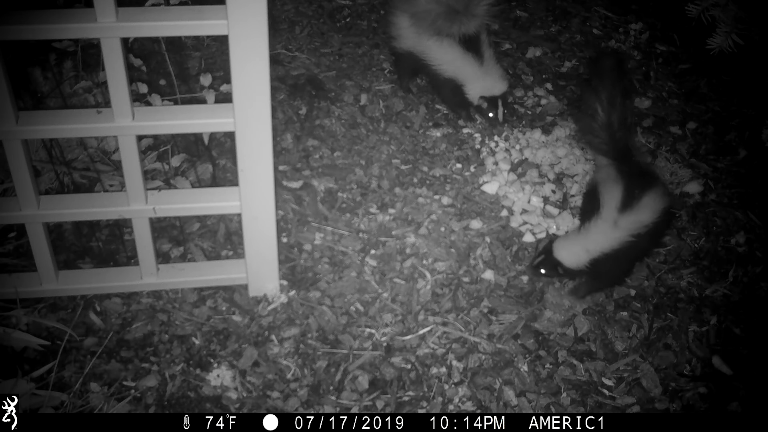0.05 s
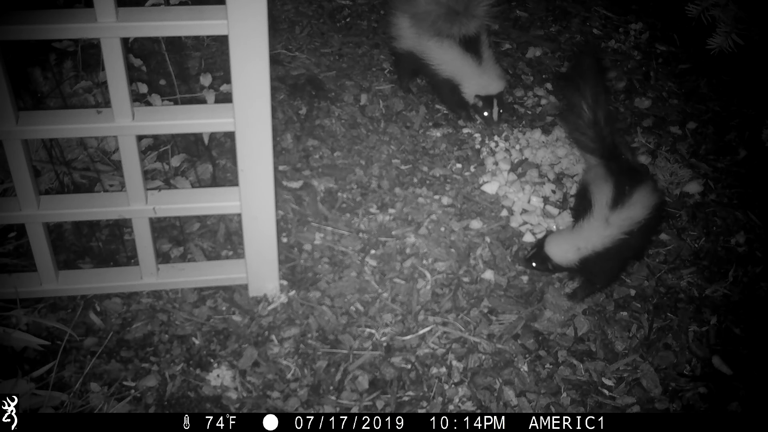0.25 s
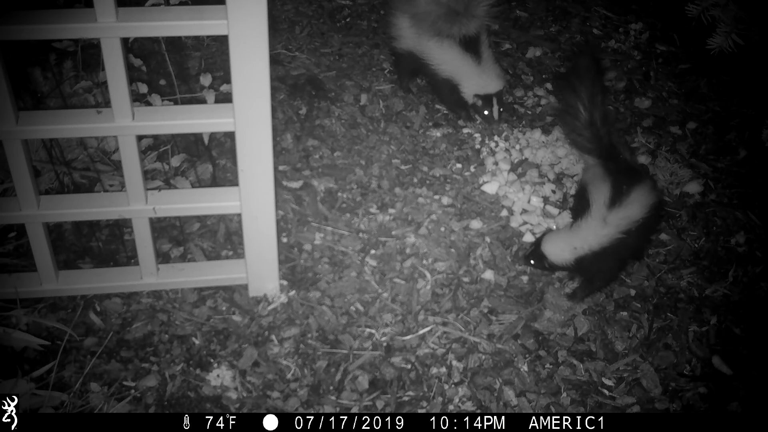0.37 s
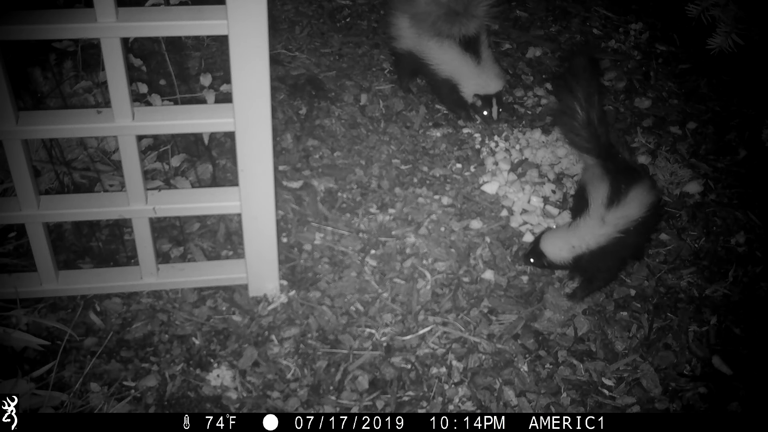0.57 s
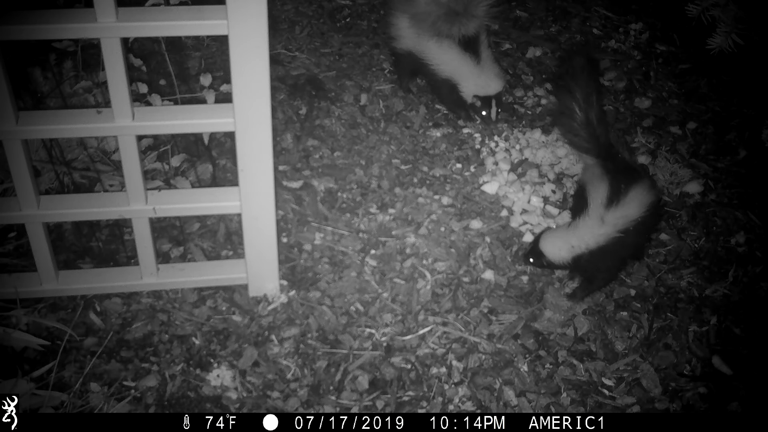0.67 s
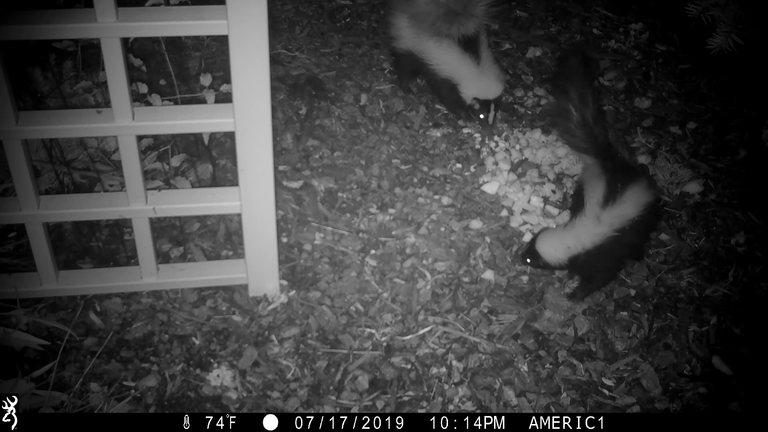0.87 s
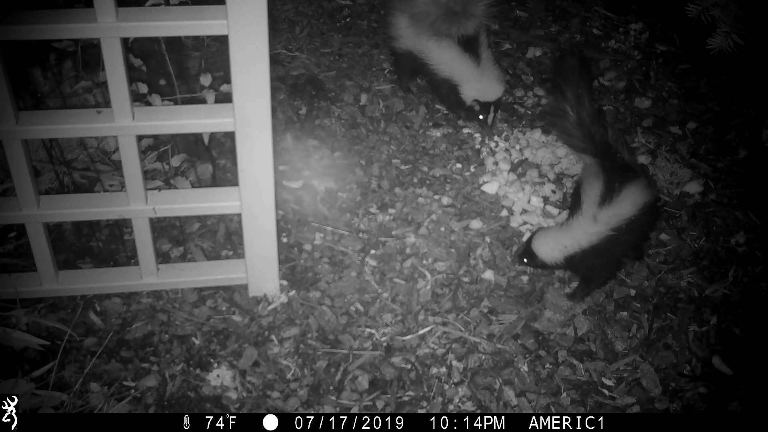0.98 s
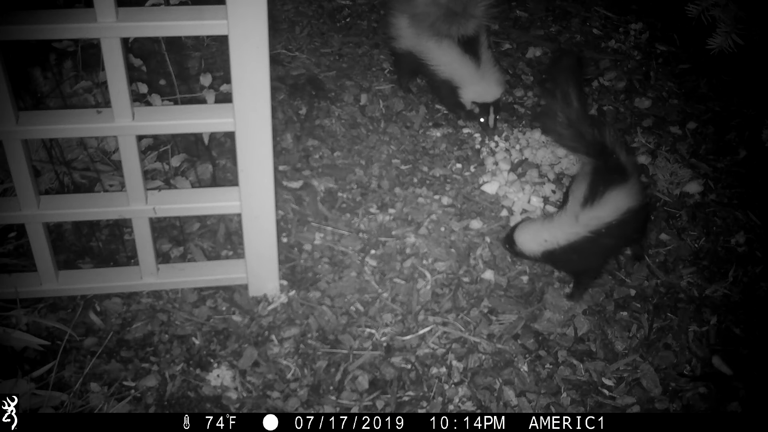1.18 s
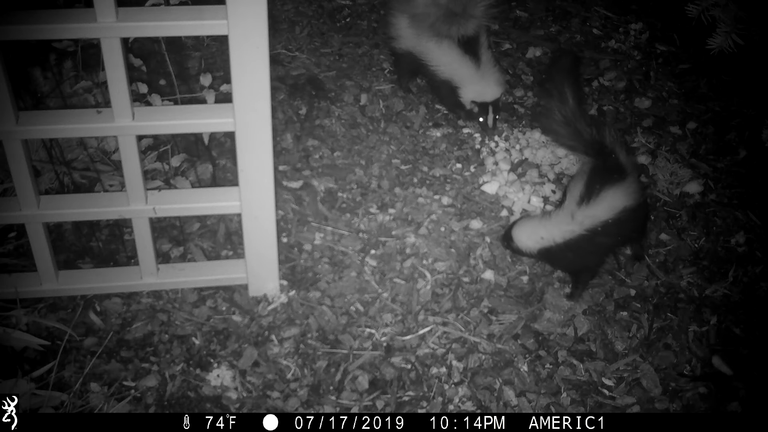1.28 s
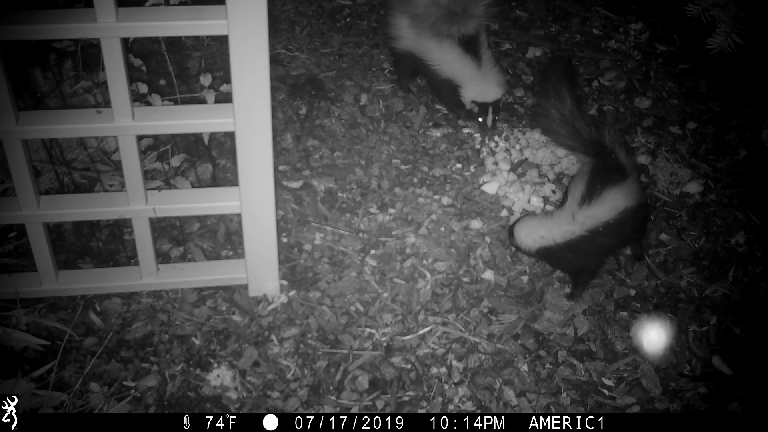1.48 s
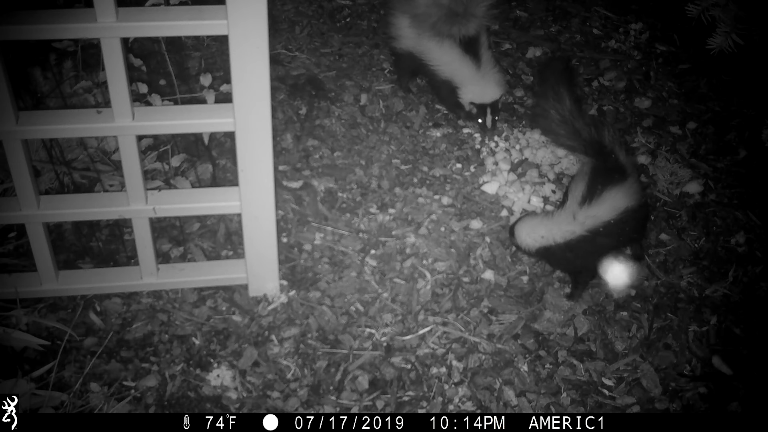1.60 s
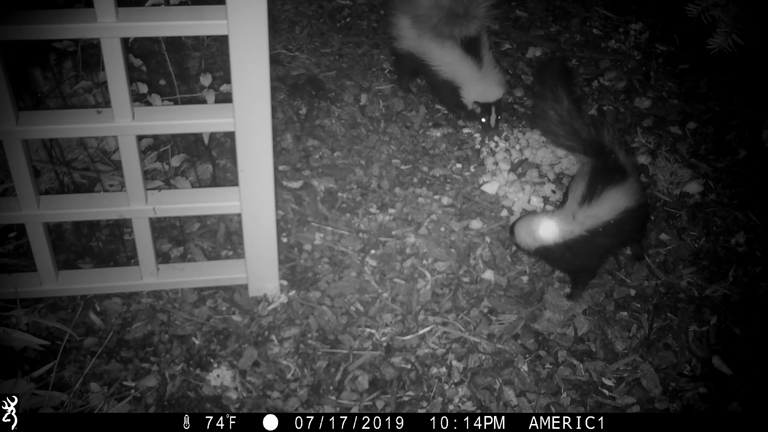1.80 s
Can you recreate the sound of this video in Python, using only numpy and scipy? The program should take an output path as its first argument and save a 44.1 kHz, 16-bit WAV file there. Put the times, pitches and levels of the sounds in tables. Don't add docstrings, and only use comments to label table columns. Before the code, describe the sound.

A skunk close by whines in a fast, raspy buzz, bursts into a short piercing squeal, goes quiet, then whines again more softly; faint paw pats, low hum and distant insects, through a narrow, overloading microphone.

```python
import sys
import numpy as np
from scipy import signal
from scipy.fft import rfft, irfft, next_fast_len
from scipy.io import wavfile
from scipy.ndimage import uniform_filter1d, map_coordinates

SR = 44100
rng = np.random.default_rng(int(sys.argv[2]) if len(sys.argv) > 2 else 0)


def gain_from_decibels(decibels):
    exponent = np.asarray(decibels, float) / 20
    return 10 ** exponent


def to_wav(sig):
    pcm = np.clip(np.atleast_2d(sig), -1, 1) * 32767
    pcm = np.round(pcm).astype(np.int16)
    wavfile.write(sys.argv[1], SR, pcm.T)


N = 81585
T = np.arange(N) / SR
STUTTER_HZ = 78


def unit(x):
    return x / np.sqrt(np.mean(x ** 2) + 1e-20)


def along(points, hz):
    point_hz, value = np.transpose(points)
    return np.interp(np.log(hz + 1), np.log(point_hz + 1), value)


def curves(rows):
    s, *columns = np.transpose(rows)
    sounding = 1. * ((T >= s[0]) & (T <= s[-1]))
    return [uniform_filter1d(sounding, size=200)] + [np.interp(T, s, c) for c in columns]


def wobble(rate):
    return map_coordinates(rng.standard_normal(N // 20), [T * rate])


def turning(hz):
    return 2 * np.pi * np.cumsum(hz) / SR


def filtered(x, response):
    m = next_fast_len(N + SR // 2)
    return irfft(rfft(x, m) * response(np.fft.rfftfreq(m, 1 / SR)), m)[..., :N]


def peak(f, hz, width):
    return 1j * f * width / (hz * hz - f * f + 1j * f * width)


def night():
    # hz, level_db (per Hz)
    hum_colour = [(20, -11), (60, -3), (185, -6), (330, -13), (620, -7), (800, -10.5), (1200, -20),
                  (4400, -29)]
    # hz, width_hz, level_db
    insects = [(2305, 670, -49.5), (3370, 540, -49)]
    grid = signal.stft(rng.standard_normal(N), nperseg=512)[2]
    patches = uniform_filter1d(rng.standard_normal(grid.shape), 4, 0)
    patches = uniform_filter1d(patches, 8, 1)
    air = signal.istft(grid * gain_from_decibels(1.2 * unit(patches)), nperseg=512)[1][:N]
    out = gain_from_decibels(-39.5) * unit(filtered(air, lambda f: gain_from_decibels(along(hum_colour, f))))
    for hz, width_hz, level_db in insects:
        band = filtered(rng.standard_normal(N), lambda f: peak(f, hz, width_hz) ** 2)
        out = out + gain_from_decibels(level_db + 2 * wobble(40)) * unit(band)
    return out


def whine(rows, stutters, ridge_db):
    # multiple, level_db
    harmonics = [(1, -1), (2, -4), (3, -7), (4, -7), (5, -7), (6, -11)]
    # hz, level_db
    mouth_bands = [(2800, -31), (3050, -4.5), (3300, -1), (3650, 1), (4000, -5), (4300, -5.5),
                   (4600, -14.5)]
    # hz, level_db (per Hz)
    breath_bands = [(300, -27.5), (700, -11), (1100, -9), (2000, -6), (2800, -3.5), (3600, 1.5),
                    (4300, -36.5)]
    jitter, open_sharpness = .012, 1.5
    ring_hz, ring_spread_hz = 3591, 240
    pulse_share = .85
    stutter_db, swell_db = 5, 1.5
    puff_rise_s, puff_fall_s = .003, .0045

    def mouth(f):
        return gain_from_decibels(along(mouth_bands, f))

    gate, pitch_hz, hum_db, rasp_db = curves(rows)
    phase = turning(pitch_hz * (1 + jitter * wobble(60)))
    hum = 0
    for k, db in harmonics:
        hum = hum + gain_from_decibels(db + 1.6 * wobble(22)) * np.sqrt(2) * np.sin(k * phase + k * k)

    opening = np.exp(open_sharpness * (np.cos(phase) - 1))
    cycle = (phase / (2 * np.pi) + .5).astype(int)
    luck = np.tanh(1.1 * rng.standard_normal((N // 20, 2)))[cycle]
    ring_phase = turning(ring_hz + 1.8 * ring_spread_hz * luck[:, 1])
    rings = opening * gain_from_decibels(3.0 * luck[:, 0]) * np.sin(ring_phase)
    hiss = filtered(opening * rng.standard_normal(N), mouth)
    puffs = np.sqrt(1 - pulse_share) * unit(hiss) + np.sqrt(pulse_share) * unit(rings)

    beat = np.sin(turning(STUTTER_HZ * (1 + 0.08 * wobble(31))))
    swell = swell_db * np.tanh(wobble(60))
    power = (gain_from_decibels(rasp_db) * unit(gain_from_decibels(stutter_db * beat + swell))) ** 2
    for s, db in stutters:
        spread_s = np.where(T < s, puff_rise_s, puff_fall_s)
        power = power + gain_from_decibels(2 * db) * np.exp(-2 * ((T - s) / spread_s) ** 2)
    effort = np.sqrt(power)

    rasp = filtered(puffs * effort, mouth) / np.std(filtered(puffs, mouth))
    ridge = gain_from_decibels(ridge_db) * effort * np.sin(turning(3590 + 40 * wobble(70)))
    breath = filtered(opening * rng.standard_normal(N), lambda f: gain_from_decibels(along(breath_bands, f)))
    return gate * (gain_from_decibels(hum_db) * (hum + gain_from_decibels(6) * unit(breath)) + rasp + ridge)


def squeal():
    # start_s, pitch_hz, level_db, flutter_depth (ratio to the whistle, may pass 1)
    path = [
        (.208, 3620, -17, .45),
        (.226, 3470, -8.5, .25),
        (.238, 3280, -10, .35),
        (.249, 3400, -5.4, .25),
        (.272, 3295, -5.6, .1),
        (.355, 3265, -8, .28),
        (.371, 3150, -10.5, .35),
        (.388, 2950, -17, .6),
        (.399, 2000, -28, 1.1),
    ]
    # centre_s, drop_db (negative is a surge)
    falters = [(.225, -2.5), (.2305, 7), (.256, 4), (.253, -3.5), (.2605, -3), (.2665, -2.5), (.27, 3),
               (.308, 5), (.32, -1), (.337, 4), (.349, 3), (.362, 3), (.376, 5)]
    falter_s, waver_hz, shimmer_db = .0028, 28, .4
    skew = .75
    hoarse, hoarse_hz = .6, 700

    gate, pitch_hz, level_db, depth = curves(path)
    for s, db in falters:
        level_db = level_db - db * np.exp(-((T - s) / falter_s) ** 2)
    slide = T * STUTTER_HZ % 1 - .5
    folds = turning(370 * (1 + 0.2 * wobble(220) - 0.083 * slide))
    phase = turning(pitch_hz + waver_hz * wobble(100))

    def shake():
        return depth * gain_from_decibels(1.2 * np.tanh(wobble(120)))

    tone = np.sin(phase)
    tone = tone + skew * shake() * np.sin(phase + folds)
    tone = tone + 0.36 * shake() * np.sin(phase - folds)
    tone = tone + 0.088 * shake() * np.sin(phase + 2 * folds)
    rough = np.tanh(wobble(hoarse_hz)) * np.sin(phase)
    rough = rough + np.tanh(wobble(hoarse_hz)) * np.cos(phase)
    tone = tone + hoarse * depth * rough
    return gate * np.sqrt(2) * gain_from_decibels(level_db + shimmer_db * np.tanh(wobble(100))) * tone


def paws():
    # start_s, peak_db, pitch_hz, t60_s
    pats = [(.394, -27, 850, .03), (.398, -25, 400, .05), (.405, -25, 620, .04), (.416, -30, 950, .04),
            (.272, -32, 450, .03), (.478, -33, 641, .04), (.519, -34, 482, .04), (.621, -33, 420, .05),
            (.627, -32, 750, .05), (.7, -34, 700, .05), (.927, -29, 700, .04), (1.128, -26, 590, .06),
            (1.305, -29, 540, .05), (1.48, -32, 600, .03)]
    out, t = np.zeros(N + SR), T[:SR // 10]
    for s, db, hz, t60 in pats:
        thump = np.sin(2 * np.pi * hz * t * (1 + 3 * t))
        overtone = 0.21 * np.sin(2 * np.pi * 2.7 * hz * t + rng.uniform(0, 9.4))
        onset = 1 - np.exp(-t / .0015)
        out[round(s * SR):][:len(t)] += gain_from_decibels(db - 60 * t / t60) * onset * (thump + overtone) * 1.6
    return out[:N]


def scene():
    # start_s, pitch_hz (folds), hum_db, rasp_db
    whine_paths = [
        [(0, 380.6, -46, -31), (.07, 393.3, -45, -33), (.13, 395.8, -43.5, -30.5), (.19, 398, -49, -36.5),
         (.225, 395, -43.5, -17), (.3, 385, -49, -23.5), (.37, 385, -49, -23), (.39, 358.3, -47, -34),
         (.4, 382.6, -34.5, -61.5)],
        [(1.02, 332.3, -45, -72), (1.07, 384.5, -44.5, -45.5), (1.162, 402.9, -42.5, -37),
         (1.43, 417, -41, -34), (1.48, 423, -45, -26), (1.53, 407, -42, -35), (1.595, 428.1, -42, -28),
         (1.625, 404.2, -45.5, -30.5), (1.85, 401, -43.5, -39.5)],
    ]
    # centre_s, level_db
    hard_puffs = [
        [(.006, -27), (.025, -29), (.038, -27), (.05, -27), (.07, -22), (.082, -28), (.1, -27), (.123, -26),
         (.131, -27), (.148, -21), (.161, -22), (.175, -18), (.187, -17), (.194, -20), (.202, -23)],
        [(1.066, -38), (1.166, -26), (1.189, -27), (1.201, -28), (1.214, -28), (1.25, -26), (1.267, -28),
         (1.289, -25), (1.3, -26), (1.337, -26), (1.352, -26), (1.398, -26), (1.436, -22), (1.459, -24),
         (1.472, -22), (1.491, -23), (1.523, -25), (1.548, -25), (1.561, -25), (1.577, -24), (1.586, -23),
         (1.6, -23), (1.613, -21), (1.624, -23), (1.664, -26), (1.703, -28), (1.731, -21), (1.742, -24),
         (1.82, -24), (1.833, -25)],
    ]
    ridges_db = [1, -10]
    yard_t60_s, yard_db = .08, -24
    near = sum(map(whine, whine_paths, hard_puffs, ridges_db)) + squeal() + paws()
    tail = rng.standard_normal(SR // 5) * gain_from_decibels(-60 * T[:SR // 5] / yard_t60_s)
    echo = signal.fftconvolve(near, tail / np.linalg.norm(tail))[:N]
    return (near + gain_from_decibels(yard_db) * echo + night())[None]


def top_cut(x):
    return signal.sosfilt(signal.butter(12, 4650, fs=SR, output="sos"), x)


def record(dry):
    top_hz, edge_hz, wall_hz = 4282, 150, 4560

    def band(f):
        slope = 1 + np.exp(np.clip((f - top_hz) / edge_hz, -50, 50))
        return (f < wall_hz) / slope

    mix = np.clip(filtered(dry, band), -1, 1)
    return top_cut(mix)


dry = scene()
out = record(dry)
to_wav(out)
```